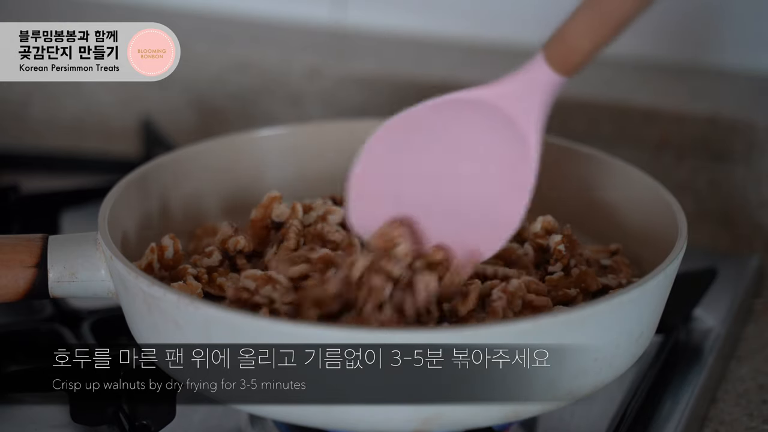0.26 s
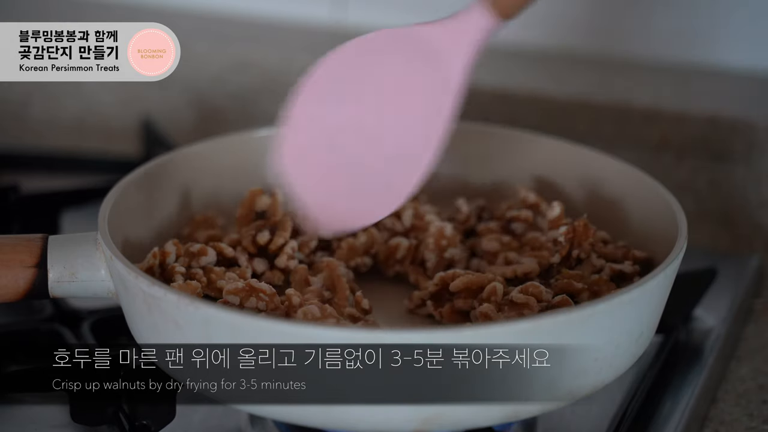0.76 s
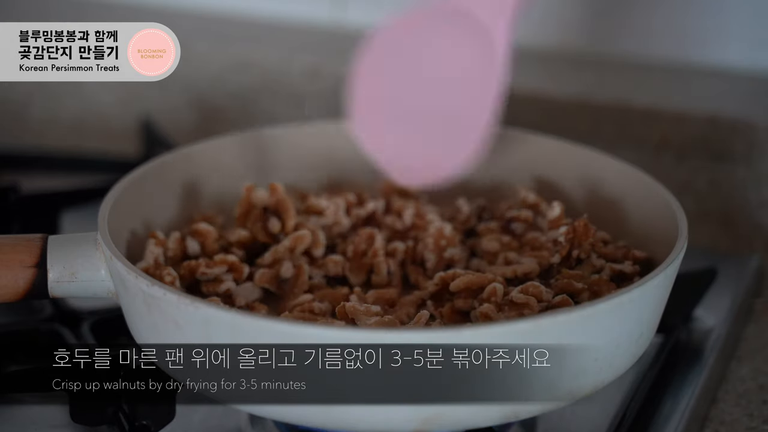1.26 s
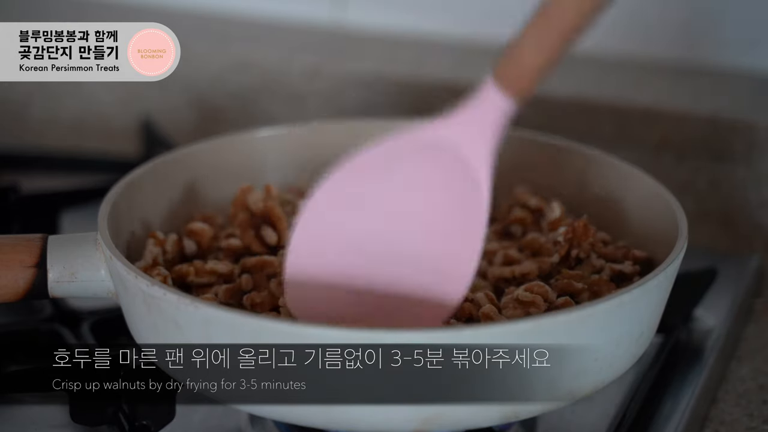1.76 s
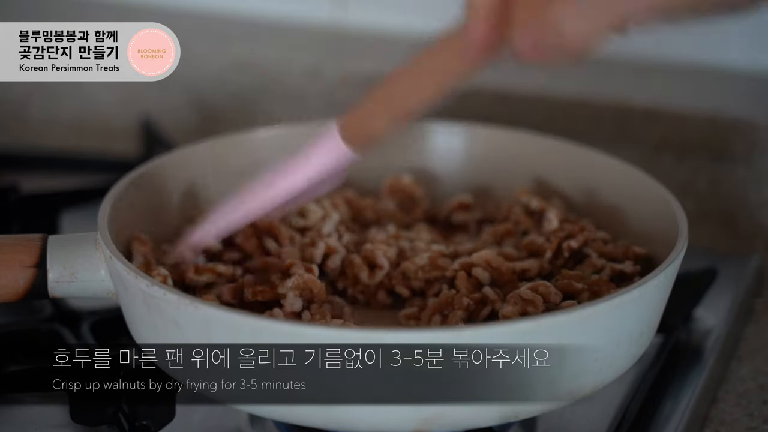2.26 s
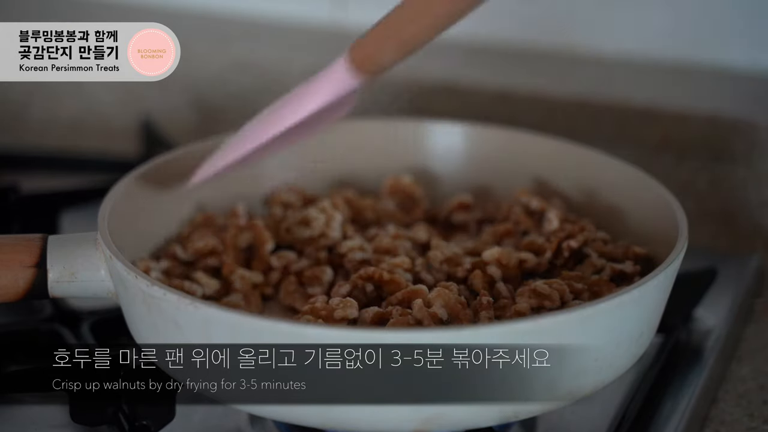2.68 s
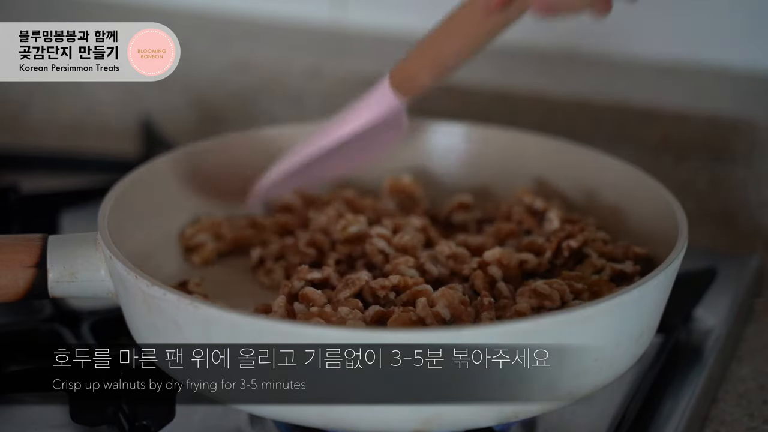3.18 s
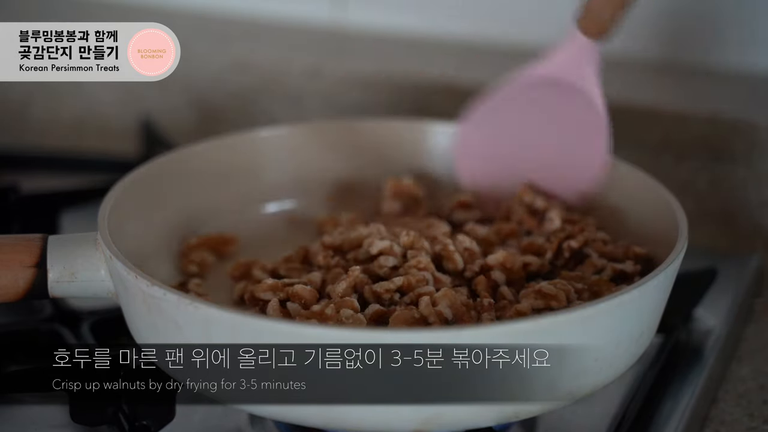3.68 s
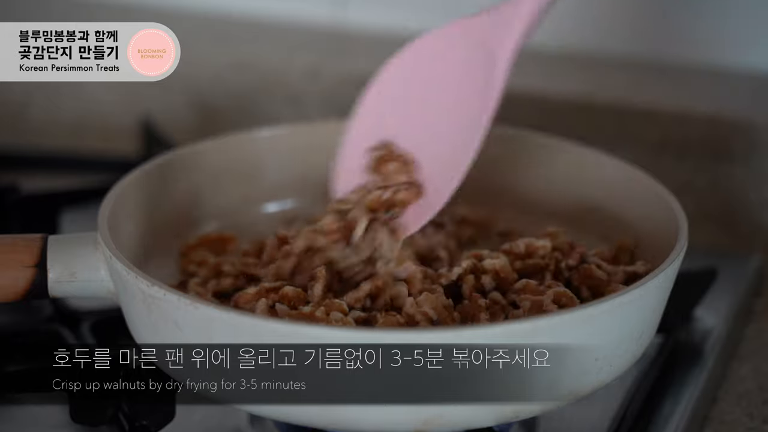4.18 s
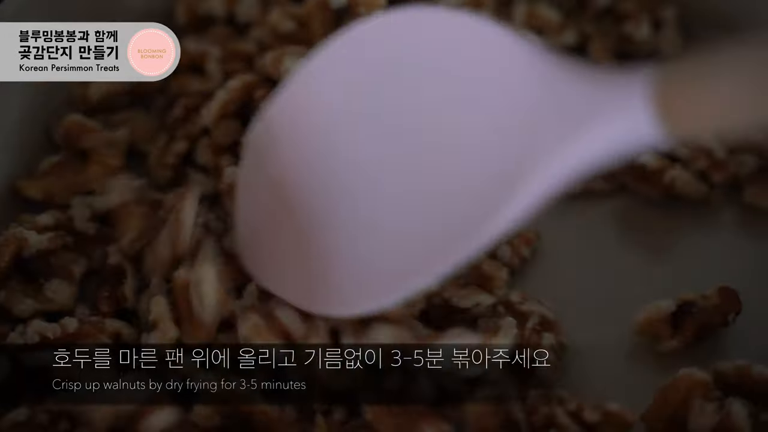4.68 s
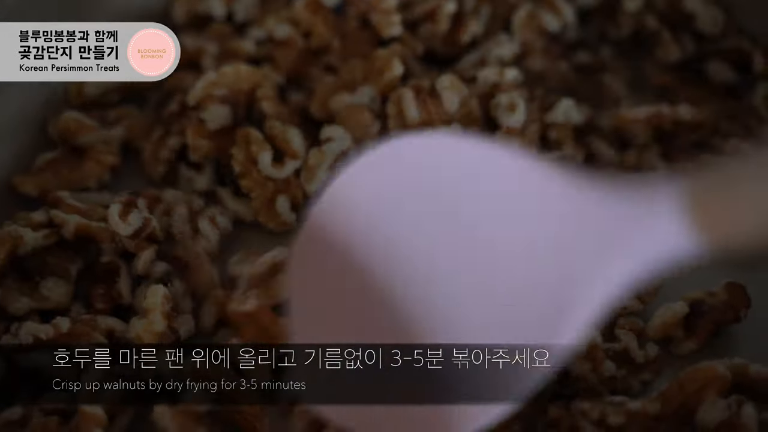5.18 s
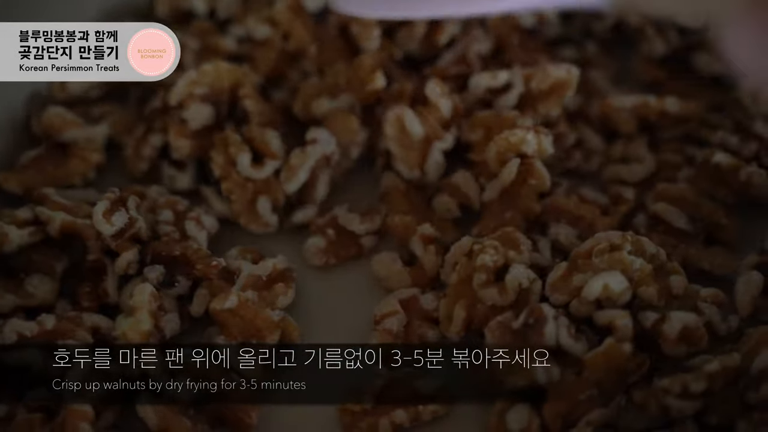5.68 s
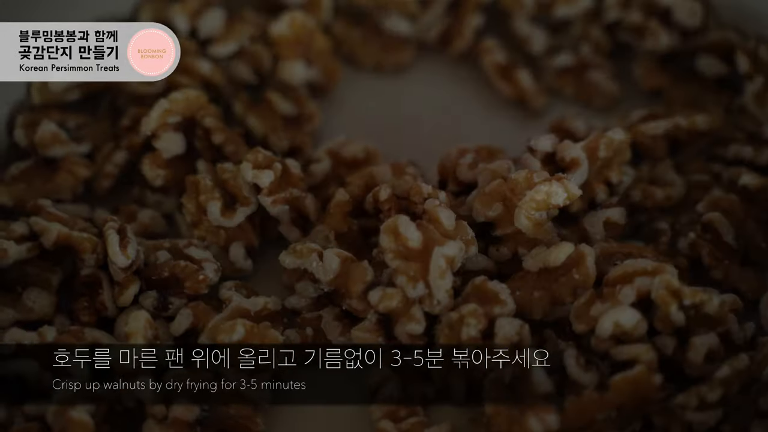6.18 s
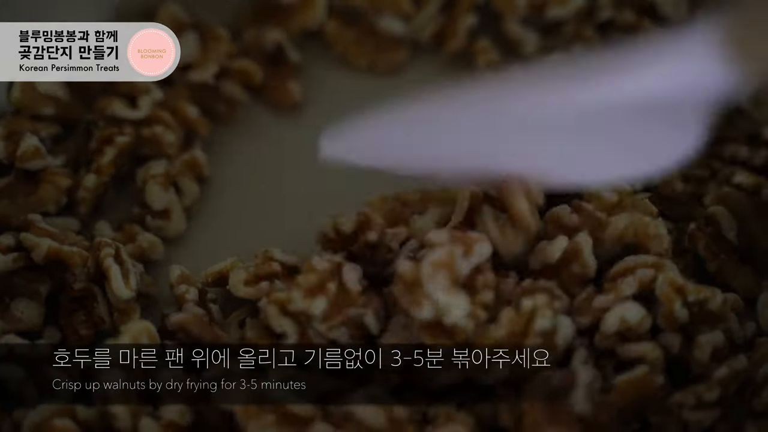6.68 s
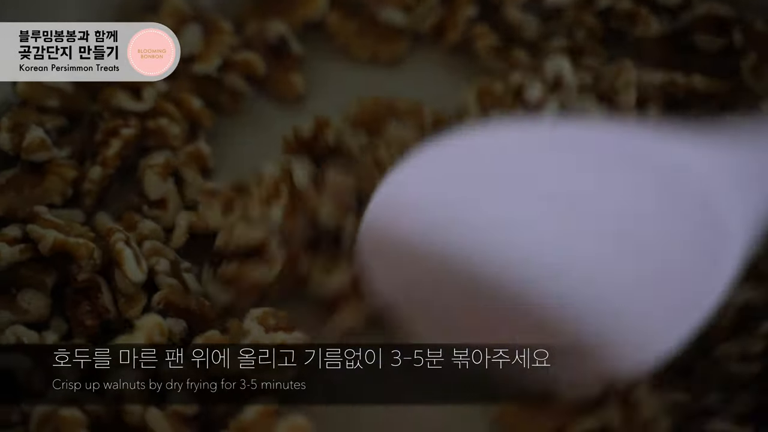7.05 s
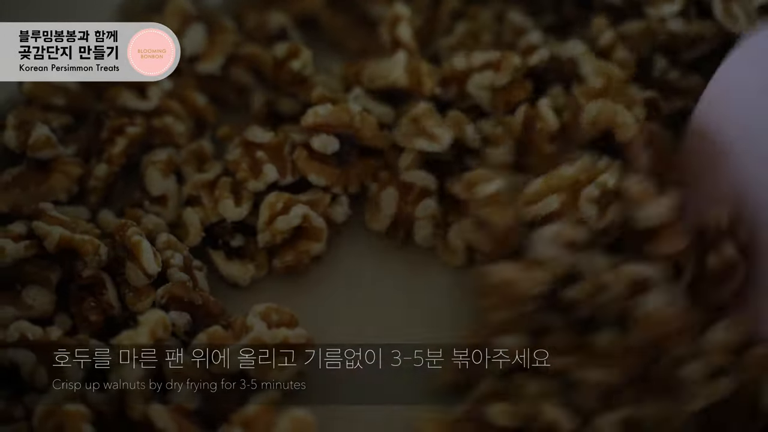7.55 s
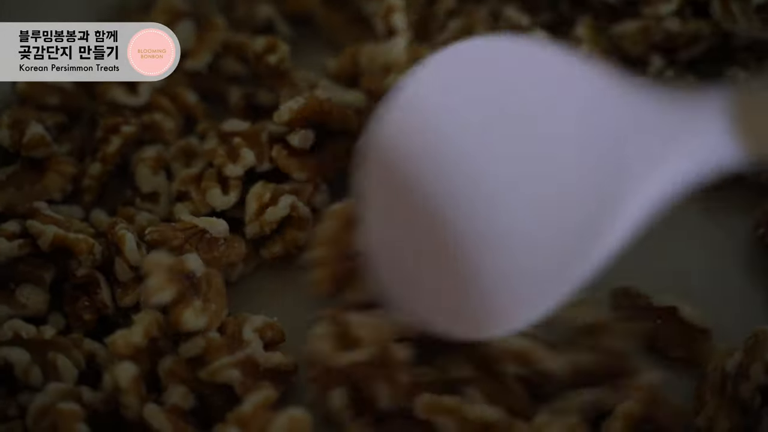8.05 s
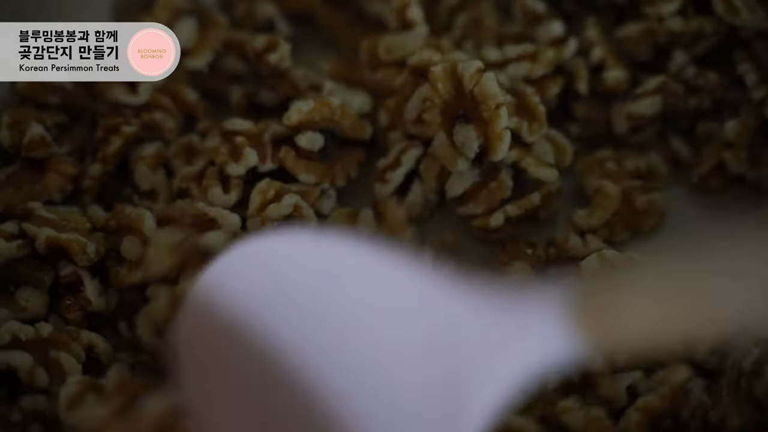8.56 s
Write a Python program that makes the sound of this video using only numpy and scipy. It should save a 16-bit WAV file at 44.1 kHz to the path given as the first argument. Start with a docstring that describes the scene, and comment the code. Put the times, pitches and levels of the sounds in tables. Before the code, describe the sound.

Nut pieces stirred with a spatula in a dry pan, tumbling and knocking over a faint, steady gas burner hiss.

```python
"""A gas burner hisses under a dry pan of walnut pieces in a small kitchen.
A silicone spatula starts to stir: nuts tumble and ring the pan's base, while the blade knocks,
digs and twice catches the rim. Just past halfway, the listening point jumps close to the pan.
From there the dry skins rustle and snap clearly, and the hardest knocks come near the end."""
import sys
import numpy as np
from scipy import signal
from scipy.fft import rfft, irfft, next_fast_len
from scipy.io import wavfile

SR = 44100
rng = np.random.default_rng(int(sys.argv[2]) if len(sys.argv) > 2 else 0)


def master(y):
    """Save y as 16-bit WAV."""
    cut = np.clip(np.atleast_2d(y).T, -1, 1)
    pcm = np.round(cut * 32767)  # scale
    wavfile.write(sys.argv[1], SR, pcm.astype(np.int16))


N = 388962
TIME = np.arange(N) / SR
HIT_TIME, RING_TIME = np.arange(8192) / SR, np.arange(3072) / SR  # seconds within one hit, one ring
MOVE_S = 4.76  # the listener jumps close


def amp(db):
    """Turn decibels into a gain."""
    return 10 ** (np.asarray(db) / 20)


def unit(x):
    """Scale a sound to an average (rms) level of 1."""
    return x / np.sqrt(np.mean(x ** 2) + 1e-20)


def along(points, hz):
    """Read a curve of (pitch_hz, value) points at any pitch."""
    pitches, values = np.transpose(points)
    return np.interp(np.log(hz + 1), np.log(pitches + 1), values)


def filtered(x, response):
    """Turn each frequency up or down by response(hz)."""
    n = x.shape[-1]
    padded = next_fast_len(n + 8192)
    return irfft(rfft(x, padded) * response(np.fft.rfftfreq(padded, 1 / SR)), padded)[..., :n]


def within(x, band):
    """Soften whatever lies outside a range of pitches."""
    edges_hz = [band[0] * .8, band[1] * 1.25]
    return signal.sosfilt(signal.butter(2, edges_hz, "band", fs=SR, output="sos"), x)


def add(track, start_s, sound):
    """Mix a sound into a track."""
    part = track[..., max(round(start_s * SR), 0):][..., :sound.shape[-1]]
    part += sound[..., :part.shape[-1]]


# How alike the two ears hear a sound: pitch_hz, likeness (1 = the same)
EAR_LIKENESS = [(100, 1), (400, 0.87), (900, 0.48), (1600, 0.32), (2500, 0.11), (5000, 0.038),
                (15000, 0.034)]
def spread(pair, colour):
    """Make stereo of two noises, toned by colour(hz): bass alike in both ears, treble apart."""
    def weights(hz):
        angle = np.arccos(np.clip(along(EAR_LIKENESS, hz), -1, 1)) / 2
        return colour(hz) * np.array([np.cos(angle), np.sin(angle)])
    mid, side = filtered(pair, weights)
    return np.array([mid + side, mid - side])


# The tone of the gas hiss, from afar and close by: pitch_hz, level_db
GAS_HISS_FAR = [(25, -30), (45, -20), (140, -21.5), (230, -4), (330, -8.5), (600, -3), (1300, 1),
                (1800, -9.5), (2400, -1.5), (3300, -5.5), (4300, -0.5), (5100, -13), (9500, -12.5),
                (15800, -12.5)]
GAS_HISS_NEAR = [(25, -36), (45, -19), (120, -18.5), (250, -4), (500, -2.5), (850, 4), (1500, 2),
                 (1950, -3), (2700, 2.5), (3300, -0.5), (4300, 1.5), (5100, -3), (11000, -5), (15800, -4.5)]
# Pitches at which the gas jet resonates: pitch_hz, width_hz, level_db
GAS_JET_FAR = [(80.3, 9.8, -22.5), (1340, 250, 3.5), (3664, 36, 1), (3980, 41, 0), (4240, 54, 7),
               (7000, 550, -0.5), (9635, 78, 1), (11130, 120, -3), (12400, 140, -11), (13750, 140, -14)]
GAS_JET_NEAR = [(84.4, 9.7, -21.5), (1190, 41, 0.5), (1530, 58, 1.5), (2540, 55, 2), (4280, 110, 2),
                (7170, 250, -3), (10100, 200, -18), (11270, 260, -1.5)]
def burner(hiss, jet, hiss_db, jet_db):
    """Steadily flowing gas makes a broad hiss, and its jet adds narrow peaks."""
    def peaks(hz):
        return np.sqrt(sum(amp(db) ** 2 / width / (1 + 2 * ((hz - pitch) / width) ** 2) ** 2
                           for pitch, width, db in jet))
    noise = lambda colour: unit(spread(rng.standard_normal((2, N)), colour))
    return amp(hiss_db) * noise(lambda hz: amp(along(hiss, hz))) + amp(jet_db) * noise(peaks)


# How long the room echoes: pitch_hz, fade_s (a fade time is the time to fall by 60 dB)
ECHO_FADES = [(200, 0.23), (1500, 0.27), (5000, 0.19), (14000, 0.21)]
# How strongly the room answers: pitch_hz, level_db
ECHO_LEVELS = [(200, -9.5), (900, -8), (1800, -5.5), (4000, -4), (12000, -2)]
def kitchen(sound):
    """Short echoes off tiles and hob, new every third of a second as the source moves about the pan."""
    out = np.zeros((2, N))
    step = SR // 3
    for start in range(0, N, step):
        hz, t, noise = signal.stft(rng.standard_normal((2, step)), SR, nperseg=256)
        fade = amp(-60 * t / along(ECHO_FADES, hz)[:, None]) * (t > .004)
        fade /= np.sqrt(np.mean(fade ** 2, axis=1, keepdims=True) * step)
        tail = signal.istft(noise * fade, SR, nperseg=256)[1]
        tail = spread(tail, lambda f: amp(along(ECHO_LEVELS, f)))
        add(out, start / SR, signal.fftconvolve(sound[:, start:start + step], tail, axes=1))
    return out


def grains(per_s, scatter_db):
    """Tiny clicks of uneven size at random times."""
    clicks = (rng.random(N) < per_s / SR) * rng.choice([-1, 1], N)
    return clicks * amp(scatter_db * np.clip(rng.standard_normal(N), -2, 2))


# The tone of the dry skins: pitch_hz, level_db
SKIN_TONE = [(1500, -20), (3500, -2.5), (6000, -3), (8500, -1), (10700, 0), (12500, -5), (15800, -6.5)]
# The blade brushing over them: middle_s, level_db, length_s
BRUSHES = [(0.967, -46, .025), (1.337, -50, .04), (1.705, -48, .1), (4.86, -49.5, 0.11),
           (5.228, -44, 0.023), (5.345, -43, 0.075), (5.546, -44.5, 0.052), (5.834, -42, .025),
           (5.957, -38, 0.02), (6.043, -44, .04), (6.618, -48, 0.15), (7.03, -53, .025),
           (7.218, -37.5, .09), (7.594, -42, 0.1), (7.816, -44, 0.068), (7.958, -38, 0.019),
           (8.206, -36, 0.056), (8.292, -38.5, 0.02), (8.614, -38, 0.023), (8.755, -39, 0.035)]
# Their unbroken rustle close by: time_s, level_db
STEADY_RUSTLE = [(4.76, -52), (7.05, -54.5), (7.2, -43.5), (7.7, -46), (8.0, -49), (8.5, -44.5),
                 (8.82, -46)]
def skins(near, brush_db, steady_db, crackle_db):
    """Papery skins rub with a fine, crackly hiss that swells and fades with each brush of the blade."""
    brushes = sum(amp(db) / (1 + (2 * (TIME - s) / length) ** 4) for s, db, length in BRUSHES)
    steady = amp(np.interp(TIME, *np.transpose(STEADY_RUSTLE), left=-np.inf, right=-np.inf))
    loudness = np.hypot(amp(brush_db) * brushes, amp(steady_db) * steady)
    crackle = np.array([unit(grains(per_s=250, scatter_db=6)) for _ in range(2)])
    noise = rng.standard_normal((2, N)) + amp(crackle_db) * crackle
    rustle = unit(spread(noise, lambda hz: amp(along(SKIN_TONE, hz))))
    return rustle * loudness * np.where(near, amp([[-1], [1]]), 1)


# Dry skins breaking: start_s, level_db, left_over_right_db
SKIN_SNAPS = [(5.955, -23, -5), (7.1435, -25, -1.5), (7.3259, -26, -4), (7.4024, -33, -5),
              (7.4896, -34, -6.5), (7.5355, -28, -4.0), (7.7833, -30, -2.0), (7.821, -30, -3.5),
              (7.9523, -26, -4), (8.1519, -32, -6), (8.212, -22.5, 1), (8.2866, -25.5, -1),
              (8.4186, -22.5, -1), (8.7518, -26.5, -2.0)]
def snaps(fade_s, gain_db):
    """A brittle skin breaks with one very short click."""
    out = np.zeros((2, N))
    for s, db, left_db in SKIN_SNAPS:
        burst = rng.standard_normal(len(HIT_TIME)) * amp(-60 * HIT_TIME / fade_s)
        click = filtered(burst, lambda hz: amp(along(SKIN_TONE, hz)))
        ears_db = np.array([[left_db], [-left_db]]) / 2
        add(out, s, amp(db + gain_db + ears_db) * click / np.abs(click).max())
    return out


# The pan's tones from afar and close by (wider ones die sooner): pitch_hz, width_hz, level_db
PAN_TONES_FAR = [(233, 76, -25), (324, 46, -12.5), (500, 126, -12), (786, 14.5, 5), (885.5, 38, 9),
                 (1095, 136, -2), (1410, 210, -11), (1678, 123, -13.5), (1930, 32, -17.5),
                 (2436, 143, -7.5), (3046, 76, -10.5), (3620, 350, -16), (4170, 580, -17),
                 (5130, 3700, -28.5)]
PAN_TONES_NEAR = [(144, 49, -28.5), (222, 27, -21), (351, 22, -12.5), (425, 60, -15), (540, 190, -18),
                  (797, 87, -7), (830, 47, 8.5), (1024, 107, -3.5), (1290, 220, -0.5), (1532, 63, 8.5),
                  (1690, 120, 1), (2290, 180, -5.5), (2945, 100, -9), (3353, 56, -12.5), (3983, 115, -7.5),
                  (4860, 380, -20.5), (6430, 280, -16.5)]
# The pitch ranges of its thump, base ring, wall ring and clack: low_hz, high_hz
PAN_RANGES = [(110, 650), (650, 1180), (1180, 2000), (2000, 9000)]
def pan_ring(tones, band, vary=True, favoured_hz=0):
    """The pan rings with its tones in one range, a little differently wherever it is touched."""
    hz, width, db = np.transpose([tone for tone in tones if band[0] <= tone[0] < band[1]])[:, :, None]
    # nuts lying on the base shift its low tones; the wall keeps its pitch
    on_base = hz < PAN_RANGES[1][1]
    hz = hz * (1 + vary * on_base * .025 * rng.standard_normal())
    # the struck spot favours one wall tone and its partner an octave up
    favour = sum(np.exp(-((k * favoured_hz / hz - 1) / .055) ** 2) for k in (1, 2))
    signs = (-1) ** np.arange(len(hz))[:, None]
    size = signs * width * amp(db + 11 * favour + vary * 2 * rng.standard_normal(hz.shape))
    return np.sum(size * np.exp(-np.pi * width * RING_TIME) * np.cos(2 * np.pi * hz * RING_TIME), axis=0)


def pan_at(s):
    """The pan's tones as heard at this time."""
    return PAN_TONES_FAR if s < MOVE_S - .02 else PAN_TONES_NEAR


# The spatula pushing through the heap of nuts: peak_s, level_db, build_up_s
PUSHES = [(0.31, -50, .4), (0.59, -38.5, 0.31), (0.8, -43, 0.9), (0.98, -37.5, .12), (1.24, -41.5, 0.77),
          (1.61, -38.5, 0.24), (1.98, -37, 0.22), (2.5, -37, 0.18), (2.99, -42.5, 0.34), (3.45, -46, 0.26),
          (4.1, -38, 0.057), (4.22, -46.5, 0.18), (4.39, -39.5, 0.089), (4.53, -42, .15),
          (4.79, -36.5, 0.044), (4.96, -37, .4), (5.3, -33.5, 0.12), (5.96, -36.5, 0.24),
          (6.62, -36.5, 0.17), (7.03, -39, 0.22), (7.2, -34.5, 0.12), (7.68, -37.5, 0.22),
          (7.99, -40, 0.53), (8.19, -35.5, 0.27), (8.27, -40.5, 0.18), (8.62, -33.5, .05),
          (8.75, -29, 0.074)]
def stirring(idle_db, build_db, settle_db_per_s):
    """How loud the shifting heap is: each push builds up, peaks and settles."""
    loudest = np.full(N, float(idle_db))
    for s, db, build_s in PUSHES:
        below_peak_db = np.maximum(build_db * (s - TIME) / build_s, settle_db_per_s * (TIME - s))
        loudest = np.maximum(loudest, db - below_peak_db)
    return amp(loudest)


def heap(near, stir, low_db, base_db, wall_db, tick_db):
    """Countless small taps in the moving heap keep the pan murmuring."""
    taps = unit(grains(per_s=450, scatter_db=3))
    def murmur(tones):
        body = sum(amp(db) * unit(within(pan_ring(tones, band, vary=False), band))
                   for band, db in zip(PAN_RANGES, (low_db, base_db, wall_db, tick_db)))
        return signal.oaconvolve(taps, body)[:N] / np.sqrt(len(RING_TIME))
    return stir * np.where(near, murmur(PAN_TONES_NEAR), murmur(PAN_TONES_FAR))


def loose_nuts(stir, per_push, spread_s, boost_db, scatter_db):
    """Each push sheds small nuts, louder when the heap moves more. Gives rows of start_s, level_db."""
    pushes = np.repeat([row[0] for row in PUSHES], per_push)
    when, size = rng.standard_normal((len(pushes), 2)).T
    times = np.clip(pushes + spread_s * when, 0, (N - 1) / SR)
    heap_db = 20 * np.log10(stir[(times * SR).astype(int)])
    return list(zip(times, heap_db + boost_db + scatter_db * size))


# The loudest nuts dropping on the pan's base: start_s, level_db
NUT_DROPS = [(0.173, -33.5), (0.256, -34), (0.306, -31), (0.584, -21), (0.621, -27), (0.651, -23.5),
             (0.709, -32), (0.801, -31.5), (1.094, -31), (1.213, -33), (1.24, -30), (1.4, -33.5),
             (1.538, -28.5), (1.581, -33.5), (1.627, -22), (1.972, -23.5), (2.065, -29.5), (2.362, -36),
             (2.5, -21), (2.561, -26), (2.877, -39), (3.01, -33.5), (3.422, -31.5), (3.446, -37),
             (4.089, -28.5), (4.213, -25), (4.302, -32), (4.524, -26), (4.629, -30.5), (4.783, -31),
             (4.899, -25.5), (4.947, -23), (5.001, -26), (5.052, -26.5), (5.385, -27.5), (5.925, -25),
             (5.973, -26), (6.055, -34), (6.57, -24), (6.592, -28), (6.632, -24), (6.959, -34.5),
             (7.112, -31.5), (7.257, -25), (7.695, -34), (7.924, -26.5), (7.936, -22), (7.987, -30),
             (8.008, -30), (8.183, -18), (8.258, -27), (8.416, -34)]
def tumbles(loose, far, near, bounce_db):
    """A light nut rolls onto the base: the ring swells, the heap muffles it, the nut rocks once more."""
    out = np.zeros(N)
    for s, db in NUT_DROPS + loose:
        view = far if pan_at(s) is PAN_TONES_FAR else near
        swell = (1 - np.exp(-(RING_TIME / .003) ** 2)) * amp(-60 * RING_TIME / view["fade_s"])
        wall_db = -11.5 + 2.5 * rng.standard_normal()  # the wall rings less than the base
        for bounce in range(2):
            base, wall, tick = [unit(swell * pan_ring(pan_at(s), band)) for band in PAN_RANGES[1:]]
            sound = unit(base + amp(wall_db) * (wall + amp(-10) * tick))
            delay_s = bounce * rng.uniform(.0064, .015)
            add(out, s + delay_s, amp(db + view["gain_db"] + bounce * bounce_db) * sound)
    return out


# The tones of the pan's rim: pitch_hz, fade_s, level_db
RIM_TONES = [(1410, 0.15, -14), (1860, 0.2, -3), (2060, 0.087, 1), (2520, 0.15, 3), (3072, 0.072, -3)]
# The spatula catching the rim: start_s, level_db
RIM_KNOCKS = [(0.524, -24.5), (0.964, -33)]
def rim():
    """A glancing knock rings the rim clearly, as no nuts muffle it."""
    out = np.zeros(N)
    chime = sum(amp(db - 60 * HIT_TIME / fade_s) * np.sin(2 * np.pi * hz * HIT_TIME)
                for hz, fade_s, db in RIM_TONES)
    chime *= 1 - np.exp(-(HIT_TIME / .0015) ** 2)
    for s, db in RIM_KNOCKS:
        add(out, s, amp(db) * chime / np.abs(chime).max())
    return out


# The spatula knocking the pan:
# start_s, level_db, wall_over_base_db, thump_db, clack_db, wall_pitch_hz, drag_s (before stretching)
KNOCKS = [(0.525, -29.5, 2, -17.5, -4, 1410, 0.027), (0.955, -34.5, -6, -10.5, -2.5, 1400, 0.034),
          (0.969, -27.5, 8, -29, -2.5, 1400, 0.051), (1.152, -35.5, -5, -28, -1.5, 1410, 0.014),
          (1.6, -42.5, 20, -26, 4.5, 1550, 0.018), (1.914, -31.5, -3, -5, -4.5, 1570, .045),
          (2.437, -28, -12, -26, -9, 1410, .066), (2.493, -30, -2.5, -19, -9, 1410, 0.023),
          (3.548, -35.5, -5.5, -28, -6.5, 1630, 0.014), (4.055, -30, 2.5, -17.5, -14, 1590, 0.021),
          (4.261, -32, -3, -8, -12.5, 1580, 0.035), (4.381, -25.5, 1.5, -20.5, -10.5, 1660, 0.034),
          (4.427, -27.5, 4, -18, -12.5, 1500, 0.022), (4.575, -27.5, 3, -9, -4.5, 1570, 0.034),
          (4.76, -32, 0, -19, -18, 1626, 0.06), (4.842, -26, -4, -24, -12.5, 1624, .073),
          (4.936, -25, -3, -33, -19, 1700, 0.016), (5.268, -21.5, 0, -24, -12, 1600, 0.039),
          (5.327, -19, 1, -41, -3, 1603, 0.031), (5.952, -27.5, -3, -27, -10.5, 1680, 0.073),
          (6.829, -31.5, 2, -36, -18, 1540, 0.031), (7.022, -16.5, 12, -21, -6, 1665, .046),
          (7.176, -17.5, 17, -15.5, -5.5, 1574, 0.039), (8.17, -23.5, -8, -46, -27, 1530, 0.038),
          (8.603, -15, 10.5, -21, -5, 1660, 0.042), (8.747, -18.5, 18, -14.5, -4, 1524, 0.024)]
def spatula(far, near, thump_stretch, hard_db, rebound_s, rebound_db, blade_hz):
    """Each knock is a sharp push, then nuts grinding under the blade; the low thump lasts longest."""
    out = np.zeros(N)
    # after a hard knock the blade bounces back once, dully
    rebounds = [(s + rebound_s, db + rebound_db, wall_db / 2, thump_db, 2 * clack_db, *rest)
                for s, db, wall_db, thump_db, clack_db, *rest in KNOCKS if db > hard_db]
    for s, db, wall_db, thump_db, clack_db, wall_hz, drag_s in KNOCKS + rebounds:
        view = far if pan_at(s) is PAN_TONES_FAR else near
        base_db = -10 * np.log10(1 + amp(wall_db) ** 2)  # base and wall share the energy
        parts_db = (thump_db, base_db, base_db + wall_db, clack_db)
        for band, part_db, stretch in zip(PAN_RANGES, parts_db, (thump_stretch, 1, 1, 1)):
            fade_s = drag_s * view["stretch"] * stretch
            grind = (1 - np.exp(-HIT_TIME / view["rise_s"])) * amp(-60 * HIT_TIME / fade_s)
            force = view["crush"] * grind * rng.standard_normal(len(HIT_TIME))
            force[0] += 1  # the sharp push
            ring = within(pan_ring(pan_at(s), band, favoured_hz=wall_hz), band)
            sound = signal.fftconvolve(force, ring)[:len(HIT_TIME)]
            add(out, s, amp(db + part_db + view["gain_db"]) * unit(sound))
    # the soft blade makes little sound above blade_hz
    return signal.sosfilt(signal.butter(3, blade_hz, fs=SR, output="sos"), out)


def scene():
    """Burner, nuts and spatula, first from afar and then from close by."""
    near = TIME > MOVE_S
    knocks = spatula(far=dict(gain_db=-17, crush=.14, stretch=2.15, rise_s=.0017),
                     near=dict(gain_db=-16, crush=.19, stretch=.68, rise_s=.0024),
                     thump_stretch=5, hard_db=-17, rebound_s=.066, rebound_db=-15, blade_hz=5260)
    stir = stirring(idle_db=-58.5, build_db=18, settle_db_per_s=102)
    loose = loose_nuts(stir, per_push=3, spread_s=.06, boost_db=6, scatter_db=2)
    nuts = tumbles(loose, far=dict(gain_db=-18.5, fade_s=.055), near=dict(gain_db=-17, fade_s=.13),
                   bounce_db=-12)
    nuts += heap(near, stir, low_db=-25, base_db=-7.5, wall_db=-11, tick_db=-16)
    balance = np.where(near, amp([[-.6], [.6]]), amp([[.4], [-.4]]))  # a little left, then right
    direct = (knocks + rim() + nuts) * balance + snaps(fade_s=.004, gain_db=3)
    gas = np.where(near, burner(GAS_HISS_NEAR, GAS_JET_NEAR, hiss_db=-48, jet_db=-52.5),
                   burner(GAS_HISS_FAR, GAS_JET_FAR, hiss_db=-51.5, jet_db=-53.5))
    return gas + direct + kitchen(direct) + skins(near, brush_db=-1, steady_db=.2, crackle_db=-5.5)


def record(dry):
    """Cut off the very highest treble."""
    return filtered(dry, lambda hz: hz < 15900)


dry = scene()
out = record(dry)
master(out)
```